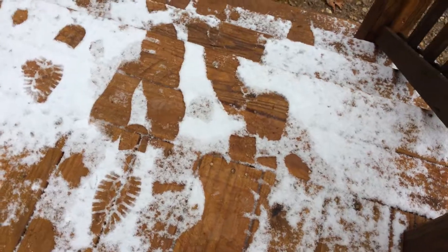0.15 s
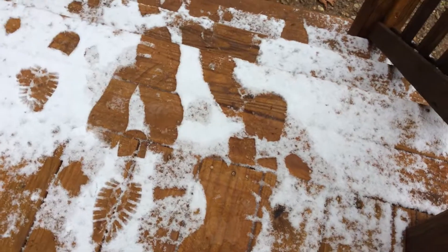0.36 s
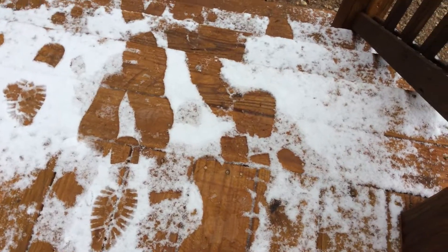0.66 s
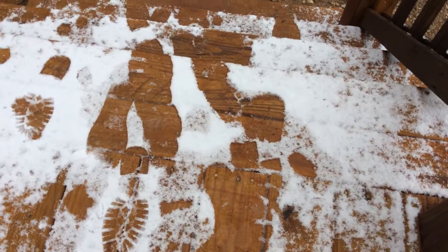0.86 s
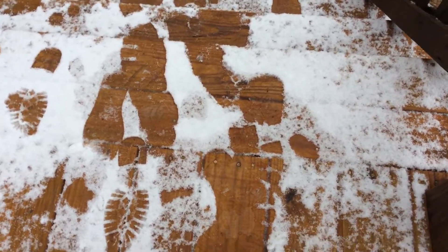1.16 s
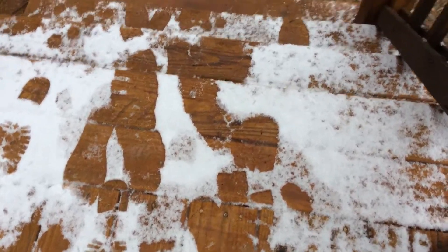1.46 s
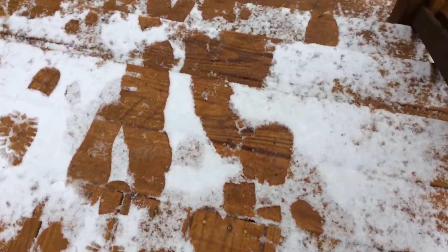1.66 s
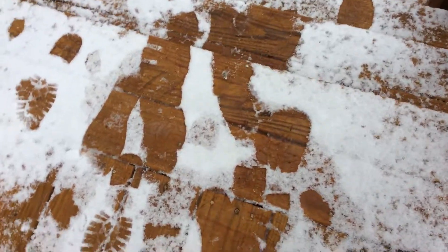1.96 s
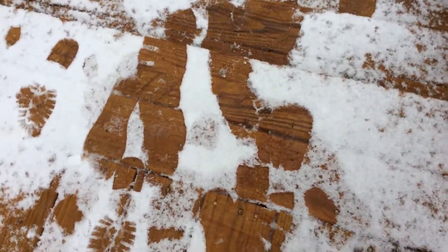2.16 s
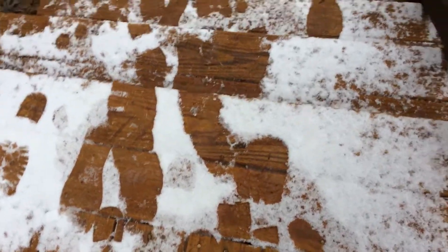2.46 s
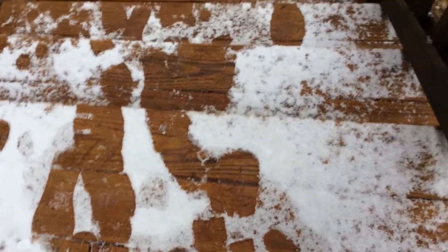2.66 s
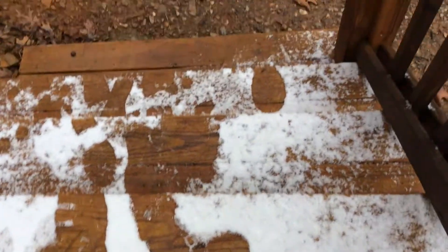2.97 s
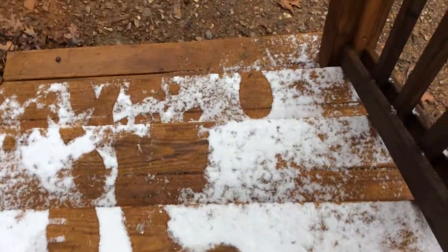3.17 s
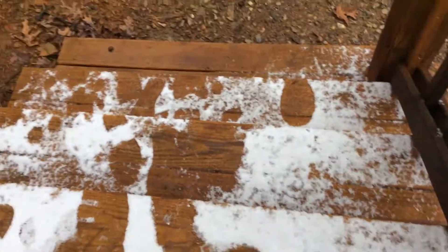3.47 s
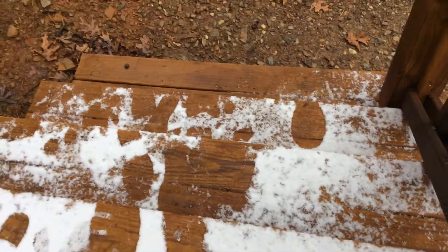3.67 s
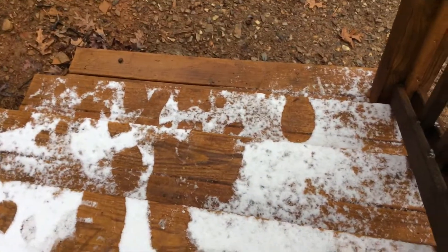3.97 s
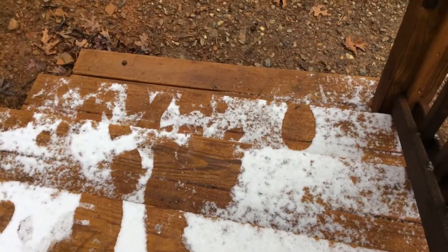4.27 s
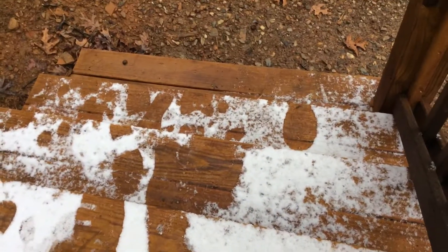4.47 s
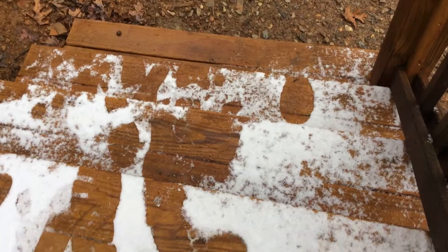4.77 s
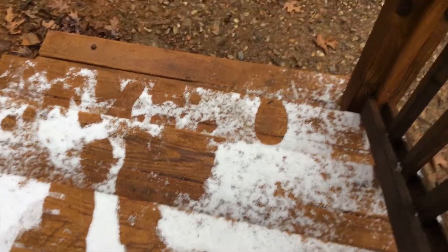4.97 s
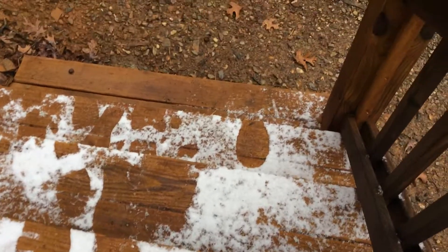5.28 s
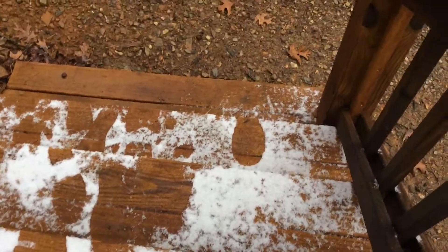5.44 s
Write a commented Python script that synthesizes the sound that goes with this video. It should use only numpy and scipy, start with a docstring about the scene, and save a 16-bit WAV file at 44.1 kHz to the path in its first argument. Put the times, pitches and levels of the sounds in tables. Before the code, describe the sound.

Slow, uneven footsteps crunch through a thin snow crust on wooden deck boards, with sharp crackles, dull knocks and a faint low hum beneath.

```python
"""Slow, uneven steps on a thin crust of snow over wooden deck boards, outdoors, close to the microphone.
Clothing swishes and light crackles come first; from 1.5 s heavier soles pack the snow in a fizz of tiny
fractures, with sharper cracks among them and the boards knocking below. A faint squeak falls in pitch at
2.2 s; uneven steps crowd together until 4.4 s, and a softer one lands near 5.2 s.
A low hum of steady sines and still outdoor air with far rumble, both shaped noise, lie under everything."""
import sys
import numpy as np
from scipy import signal
from scipy.fft import rfft, irfft
from scipy.io import wavfile

SR = 44100
rng = np.random.default_rng(int(sys.argv[2]) if len(sys.argv) > 2 else 0)


def put_to_file(sound):
    """Save the sound as 16-bit audio at rate SR, in the file named by the first command-line argument."""
    columns = np.atleast_2d(sound).T  # one column per channel
    safe = np.clip(columns, -1, 1)
    whole_steps = np.round(safe * 32767)
    wavfile.write(sys.argv[1], SR, whole_steps.astype(np.int16))


N = 247401

# Colour of breaking snow. Each row: frequency in Hz, relative level per Hz in dB.
SNOW_SPECTRUM = [(100, -36), (220, -14.5), (340, 0.5), (550, -5), (900, -10.5), (1300, -1.5), (1800, -1),
                 (2400, -7), (3200, -0.5), (4100, 1.5), (5500, -13.5), (7200, -17), (9000, -13),
                 (12000, -22), (16000, -28)]


def gain_of(db):
    """Decibels to amplitude."""
    return 10 ** (np.asarray(db) / 20)


def evened(x):
    """Scales to rms 1."""
    return x / np.sqrt(np.mean(x ** 2) + 1e-20)


def read(points, hz):
    """Reads a spectrum on a log-frequency axis."""
    f, value = np.transpose(points)
    return np.interp(np.log(hz + 1), np.log(f + 1), value)


def follow(rows, t):
    """Every column of a curve table at the times t."""
    s, *columns = np.transpose(rows)
    return [np.interp(t, s, c) for c in columns]


def add(mix, s, sound):
    """Mixes a sound in at s seconds."""
    part = mix[max(round(s * SR), 0):][:len(sound)]
    part += sound[:len(part)]


def coloured(x, points):
    """Gives x a spectrum, at rms 1."""
    gain = gain_of(read(points, np.fft.rfftfreq(N, 1 / SR)))
    return evened(irfft(rfft(x) * gain, N))


def drift(rate_hz):
    """Random wander of rms 1: noise under a Gaussian low-pass."""
    lowpass = np.exp(-(np.fft.rfftfreq(N, 1 / SR) / rate_hz) ** 2)
    return evened(irfft(rfft(rng.standard_normal(N)) * lowpass, N))


def grains(per_s, spread_db):
    """Random clicks of either sign: many small, a few large."""
    size = gain_of(spread_db * np.minimum(rng.exponential(1, N), 3.5))
    sign = rng.choice([-1., 1.], N)
    fires = rng.random(N) < per_s / SR
    return evened(size * sign * fires)


def causal(gain):
    """Minimum phase: the spectrum with this gain that starts at once and rings afterwards."""
    log_gain = np.log(np.maximum(np.r_[gain, gain[-2:0:-1]], 1e-5))
    return np.exp(np.conj(signal.hilbert(log_gain)))[:len(gain)]


def wavelet(t, hz, cycles, phase):
    """A fracture's ping: swells and dies within a few cycles; unit energy."""
    u = t * hz / cycles
    ping = u ** 2 * np.exp(-3 * u) * np.cos(2 * np.pi * (hz * t + phase))
    return ping / np.linalg.norm(ping)


def crunch(level_db=-2, clump_db=2.0, ring_db=5, octaves=0.35, fizz_db=0, boards_db=-1.0):
    """Thousands of tiny fractures, coming in clumps as the snow gives way under the weight."""
    clumps = gain_of(clump_db * drift(rate_hz=83))
    breaking = evened(fractures(per_s=330, spread_db=3.5, cycles=2.08, count=22) * clumps)
    # recolour frame by frame as the pressing sole changes
    hz, t, frames = signal.stft(breaking, SR, nperseg=256, noverlap=192)
    _, pitch_hz, treble_db, body_db = np.array(pressing(t))[:, :, None]
    colour = snow_colour(hz, t[:, None], pitch_hz, treble_db + fizz_db, body_db + boards_db,
                         ring_db, octaves)
    sound = signal.istft(frames * colour.T, SR, nperseg=256, noverlap=192)[1][:N]
    return sound * gain_of(level_db + pressing(np.arange(N) / SR)[0])


def fractures(per_s, spread_db, cycles, count):
    """Pings of many pitches, each pitch firing at its own random moments; roughly flat in spectrum."""
    t = np.arange(1024) / SR
    out = np.zeros(N)
    for hz in np.geomspace(260, 16000, count):
        # small, high crystals break more often
        moments = grains(per_s * np.sqrt(hz / 3000), spread_db)
        ping = wavelet(t, hz, cycles, rng.random())
        out += np.sqrt(hz) * signal.oaconvolve(moments, ping)[:N]
    return evened(out)


def pressing(t, attack_s=.008, attack_per_hold=.25, touch_db=-21, touch_s=.07):
    """Level, grain pitch, treble and body at times t: presses rise, hold and let go; their powers add, and each
    colour is a power-weighted mean over the presses."""
    # A heel or sole presses into the snow. Each row: start of full weight in seconds, hold in seconds,
    # release to fall 20 dB in seconds, level in dB before layer trims, pitch of the grains in Hz,
    # treble lift in dB and lift of the boards' low body in dB, both before layer trims.
    presses = [(0.03, .09, .1, -58, 2200, 7, 5), (0.205, .035, .06, -60, 3600, 5, 3),
               (0.372, .09, .2, -57.5, 3600, 9, 9), (1.479, .075, 0.09, -40.5, 3680, 11, 7),
               (1.566, 0.056, 0.05, -27, 3680, 5, -5.5), (1.655, .01, .05, -45, 3700, 7, 7),
               (1.681, 0.0074, 0.2037, -40.5, 3500, 7, 4), (1.835, .045, .07, -48.5, 3950, 10, 3),
               (2.59, .006, .06, -56, 3470, 8, 6), (2.747, .005, .018, -30, 3280, 2.5, 8),
               (2.77, .008, .05, -41, 3100, 3, 3), (2.803, .012, .06, -43.5, 3170, 7, 6),
               (2.898, .004, .02, -41, 3630, 4, 8), (2.968, 0.063, 0.08, -46.5, 2500, 8, 4),
               (3.403, .035, .07, -44.5, 1980, -2, 2), (3.694, .03, .08, -41.5, 2400, 6, 10),
               (3.76, .055, .018, -36.5, 2900, 5.5, 4), (3.903, .012, .03, -43.5, 2940, 3, 2),
               (3.98, .075, .05, -54, 3130, 6, 8.5), (4.237, .004, 0.0384, -33, 3070, 3, 7),
               (4.282, .028, .09, -45, 3040, 2, 5), (5.168, .006, .018, -42, 1800, 3, 7),
               (5.07, .012, .03, -57, 1900, -4, 0)]
    s, hold_s, release_s, db, *colours = np.transpose(presses)
    before = np.maximum(s - t[:, None], 0)
    after = np.maximum(t[:, None] - s - hold_s, 0)
    rise_s = attack_s + attack_per_hold * hold_s  # 20 dB of rise; a longer press comes on more slowly
    weight = gain_of(-20 * (before / rise_s + after / release_s))
    # light contact around each press fades 20 dB in touch_s
    touch = gain_of(touch_db - 20 * (before + after) / touch_s)
    power = (gain_of(db) * np.maximum(weight, touch)) ** 2 + 1e-14
    total = power.sum(1)
    return [10 * np.log10(total)] + [power @ colour / total for colour in colours]


def snow_colour(hz, s, pitch_hz, treble_db, body_db, ring_db, octaves, hollow_octaves=0.2):
    """Gain of breaking snow: two resonances, fizz on top, boards below; unit power in the crunch band."""
    # Each place the foot meets has its own colour. Each row: time in seconds, hollow resonance in Hz,
    # its lift in dB, lift of the sheen above about 12 kHz in dB.
    footing = [(.45, 1510, 8, 4), (1.49, 1750, -1, -6), (1.6, 1760, 9, -9.5), (1.9, 1700, -3.5, 0),
               (2.5, 2600, 2.5, 3), (2.8, 2020, 10, -8), (3.0, 2130, 4, -5), (3.42, 2023, 1, -2),
               (3.78, 2900, 11, -11), (4.0, 2870, 11, -17), (4.28, 3210, 1.5, -13), (5.17, 1478, 5, -3)]
    hollow_hz, hollow_db, sheen_db = follow(footing, s)
    hollow = hollow_db * np.exp(-(np.log2((hz + 1) / hollow_hz) / hollow_octaves) ** 2)
    ring = ring_db * np.exp(-(np.log2((hz + 1) / pitch_hz) / octaves) ** 2)
    treble = treble_db / (1 + (5900 / (hz + 1)) ** 10)
    sheen = sheen_db / (1 + (11800 / (hz + 1)) ** 20)
    body = body_db / (1 + (hz / 950) ** 6)
    gain = gain_of(read(SNOW_SPECTRUM, hz) + hollow + ring + treble + sheen + body)
    band = (hz > 1000) & (hz < 5000)
    return gain / np.sqrt(np.mean(gain ** 2 * band, axis=-1, keepdims=True))


def cracks(rows, level_db=-1, cycles=1.63, crumble=0.9, crumble_s=0.0015, rise_s=0.00038, echo_db=-11,
           echo_s=0.0041, ring_db=5, octaves=0.26, body_db=-3, fizz_db=1, weakest_db=-58):
    """Each crack is a short ping in a puff of crumbs; the boards scatter it back milliseconds later."""
    size = 2048
    out, t, hz = np.zeros(N), np.arange(size) / SR, np.fft.rfftfreq(size, 1 / SR)
    span = np.sqrt(.004 * SR)  # row levels refer to 4 ms
    band = (hz > 1000) & (hz < 5000)
    puff = np.exp(-t / crumble_s) * (1 - np.exp(-(t / rise_s) ** 2))
    noises = rng.standard_normal((len(rows), 2, size))
    for (s, db, pitch_hz, treble_db), (noise, scatter) in zip(rows, noises):
        if db < weakest_db:  # lighter contact does not break the crust
            continue
        colour = causal(snow_colour(hz, s, pitch_hz, treble_db + fizz_db, body_db, ring_db, octaves))
        crumbs = rfft(noise * puff) * colour / np.linalg.norm(noise * puff)
        ping = rfft(wavelet(t, pitch_hz, cycles, noise[0]))  # random phase
        crack = ping + crumble * crumbs
        crack = crack / np.sqrt(np.mean(abs(crack) ** 2 * band))
        echo = scatter * np.exp(-((t - echo_s) / 0.0039) ** 2)
        boards = 1 + gain_of(echo_db) * rfft(echo / np.linalg.norm(echo))
        add(out, s, gain_of(db + level_db) * span * irfft(crack * boards))
    return out


def small_cracks(per_s=90, over_db=-1.5, spread_db=2.2, scatter_octaves=.2, fizz_db=-1):
    """Rows of lesser cracks at jittered moments; they take the strength and colour of the pressing sole."""
    slots = np.arange(0, N / SR, 1 / per_s)
    late, size, tune = rng.standard_normal((len(slots), 3)).T
    s = np.clip(slots + .5 * late / per_s, 0, N / SR)
    db, pitch_hz, treble_db, _ = pressing(s)
    level_db = db + over_db + spread_db * np.minimum(size, 2)
    return np.c_[s, level_db, pitch_hz * 2 ** (scatter_octaves * tune), treble_db + fizz_db]


def knocks(level_db=-1, cycles=1.45, ring_db=-9, octaves=0.37):
    """A blunt push of a few cycles; the damped board modes near its pitch ring on briefly."""
    # A heel or sole meets the boards. Each row: start in seconds, level in dB before the layer trim,
    # pitch in Hz.
    board_hits = [(1.473, -36.5, 445.6), (2.4047, -27, 530), (2.409, -29.5, 570), (2.7442, -25, 368),
                  (2.747, -27.5, 690), (2.827, -31.5, 390), (2.971, -45.5, 350), (3.004, -41, 345),
                  (3.03, -41.5, 343), (3.416, -35.5, 352), (3.6923, -35.5, 400), (3.781, -43, 363.2),
                  (4.2343, -30, 521), (4.24, -31.5, 477), (5.171, -34.5, 377)]
    # Modes of a deck board. Each row: frequency in Hz, relative level in dB, 60 dB decay in seconds.
    board_modes = [(323, -8.5, 0.083), (383, -6.5, 0.034), (423, -15, 0.052), (490, 3, 0.06),
                   (530, -10, 0.038), (725, 17, 0.019), (1180, -8, .015)]
    out, t = np.zeros(N), np.arange(SR // 10) / SR
    for s, db, pitch_hz in board_hits:
        push = wavelet(t, pitch_hz, cycles, 0)
        modes = np.zeros(len(t))
        for hz, mode_db, t60 in board_modes:
            nearness = 1 / (1 + (np.log2(hz / pitch_hz) / octaves) ** 2)
            modes += gain_of(mode_db - 60 * t / t60) * np.sin(2 * np.pi * hz * t) * nearness
        ring = signal.fftconvolve(push, modes)[:len(t)]
        knock = push / abs(push).max() + gain_of(ring_db) * ring / abs(ring).max()
        add(out, s, gain_of(db + level_db) * knock)
    return out


def stray_ticks(level_db=-9, per_s=35):
    """Loose crystals snap now and then as the walker shifts weight."""
    return coloured(grains(per_s, spread_db=3.5), SNOW_SPECTRUM) * swishing() * gain_of(level_db)


def deck(x, tail_db=-19, tail_t60=0.21, delay_s=0.0041):
    """Railing and wall throw back a faint, short tail of decaying noise."""
    t = np.arange(SR // 3) / SR
    tail = rng.standard_normal(len(t)) * gain_of(-60 * t / tail_t60) * (t > delay_s)
    return x + gain_of(tail_db) * signal.fftconvolve(x, tail / np.linalg.norm(tail))[:N]


def clothing(level_db=-1, flutter_db=1.0):
    """Fabric sliding on fabric: a fine, dense hiss that follows the walker's movement."""
    # Colour of the fabric. Each row: frequency in Hz, relative level per Hz in dB.
    cloth_spectrum = [(800, -1.5), (1500, -17.5), (2200, -13.5), (3100, -7.5), (3950, 3.5), (5200, -6),
                      (7000, -9.5), (9000, -3.5), (11500, -10), (16000, -19.5)]
    hiss = coloured(grains(per_s=14000, spread_db=3.5), cloth_spectrum)
    return hiss * swishing() * gain_of(level_db + flutter_db * drift(rate_hz=120))


def swishing(base_db=-70.5):
    """Strength of the walker's movement: a smooth swell for each swing of a limb, never quite still."""
    # A sleeve or trouser leg swings past. Each row: middle in seconds, half length in seconds,
    # level in dB before layer trims.
    swings = [(0.024, 0.19, -62.5), (0.396, 0.084, -61), (.57, 0.11, -63.5), (0.794, 0.08, -68.5),
              (1.201, 0.12, -57.5), (1.41, 0.08, -58), (1.972, 0.14, -64), (2.347, 0.12, -58.5),
              (2.59, 0.14, -61.5), (3.14, 0.093, -61), (5.0, 0.16, -70), (5.25, .09, -65.5),
              (5.42, .14, -69)]
    t = np.arange(N) / SR
    power = sum((gain_of(db) * np.exp(-((t - s) / half_s) ** 2)) ** 2 for s, half_s, db in swings)
    return np.sqrt(power + gain_of(base_db) ** 2)


def squeak(start_s=2.215, length_s=.06, from_hz=1480, to_hz=1340, level_db=-66):
    """One faint squeak: a sine falling in pitch under a half-sine swell."""
    u = np.clip((np.arange(N) / SR - start_s) / length_s, 0, 1)
    turns = np.cumsum(from_hz + (to_hz - from_hz) * u) / SR
    return gain_of(level_db) * np.sin(np.pi * u) * np.sin(2 * np.pi * turns)


def hum(waver_db=0.5, wander=.08):
    """Steady low hum lines that waver slightly in phase (radians) and together in level."""
    # Lines of the hum. Each row: frequency in Hz, rms level in dB before the waver.
    hum_lines = [(120, -53), (144, -72), (180, -76), (240, -85.5)]
    t = np.arange(N) / SR
    lines = np.zeros(N)
    for hz, db in hum_lines:
        phase = 2 * np.pi * (hz * t + rng.random()) + wander * drift(rate_hz=3)
        lines += gain_of(db) * np.sin(phase)
    return np.sqrt(2) * lines * gain_of(waver_db * drift(rate_hz=3))


def outdoors(air_db=-62.5, rumble_db=-63):
    """Still air and a far, low rumble: two steady shaped noises."""
    # Colour of the still air. Each row: frequency in Hz, relative level per Hz in dB.
    air_spectrum = [(90, -36), (150, -4), (290, -9.5), (500, -15), (800, -20), (1100, -21.5), (1600, -29.5),
                    (2300, -31.5), (3400, -23), (5000, -46), (6900, -44), (9000, -41.5), (12900, -43),
                    (16000, -50)]
    # Colour of the far rumble. Each row: frequency in Hz, relative level per Hz in dB.
    rumble_spectrum = [(15, -17), (30, -18.5), (50, -2.5), (80, -2.5), (130, -2), (200, -12.5), (400, -42)]
    air, rumble = rng.standard_normal((2, N))
    return (gain_of(air_db) * coloured(air, air_spectrum)
            + gain_of(rumble_db) * coloured(rumble, rumble_spectrum))


def scene():
    """Steps on the deck over the quiet background."""
    # The loudest cracks of the crust. Each row: start in seconds, level over 4 ms in dB and
    # before the layer trim, pitch of the crack in Hz, treble lift in dB before the layer trim.
    loud_cracks = [(0.0247, -48.5, 1620, -2), (0.0847, -49, 1850, 10), (0.1232, -48, 1590, 9),
                   (0.1693, -55, 3510, 12.5), (0.3702, -46, 1590, 13), (0.4314, -48.5, 4000, 14),
                   (0.4632, -43.5, 1590, 7), (0.4693, -43, 1790, 23), (0.5544, -45.5, 3220, 6),
                   (1.4743, -39, 3560, 17), (1.478, -38, 3420, 19), (1.5066, -28, 3020, 12.5),
                   (1.5228, -37, 3820, 13), (1.5484, -33, 3330, 1), (1.5648, -22, 3650, -8),
                   (1.5848, -25, 2920, 9), (1.6041, -24.5, 1780, 8), (1.6334, -28.5, 3060, -11),
                   (1.7285, -29, 3900, 8.5), (1.752, -39, 3220, 1), (1.7975, -39.5, 3590, 4),
                   (1.833, -39.5, 3860, 5), (1.8632, -42, 4030, 17), (1.8792, -43.5, 4000, 26),
                   (1.9338, -42.5, 3650, 9), (2.4041, -43.5, 2230, -4), (2.4084, -44, 1580, -20),
                   (2.4527, -43.5, 2980, 5), (2.5029, -52, 3070, 1), (2.5686, -45, 1920, -9),
                   (2.5715, -41, 3220, 3), (2.5988, -34, 2840, 2), (2.7437, -30, 3360, 3),
                   (2.7463, -30, 2970, 4), (2.7492, -26, 2400, 6), (2.7515, -27, 3850, -5),
                   (2.7705, -32.5, 3240, -1), (2.7938, -29, 3500, 1), (2.8279, -20, 3430, -3),
                   (2.8337, -28, 3680, 2), (2.8545, -30, 2850, -2), (2.8928, -31, 3900, 2.5),
                   (3.1223, -50.5, 1720, 4.5), (3.346, -41.5, 1830, -7), (3.4078, -33, 2030, -2.5),
                   (3.4183, -26.5, 2890, -12), (3.4389, -34.5, 1750, -14), (3.4947, -47, 2840, 6),
                   (3.6839, -42.5, 3273, 14), (3.7152, -35.5, 2740, 10), (3.7379, -29.5, 3180, 6),
                   (3.7827, -25.5, 2770, 4), (3.8137, -32.5, 2780, 9), (3.8818, -38, 2880, 9.5),
                   (3.896, -32, 2880, 7), (3.911, -24, 2930, 2.5), (3.9235, -39, 3300, 11),
                   (3.945, -36, 2850, 6), (3.969, -31, 2025, 1), (3.982, -37, 3104, 8),
                   (4.0398, -33, 2760, 10.5), (4.072, -47.5, 2480, -1), (4.1023, -50, 1920, -2),
                   (4.2189, -37.5, 2690, 3), (4.2347, -29.5, 3160, 8.5), (4.2409, -32, 3100, -6),
                   (4.2966, -35, 3140, -2), (4.3045, -33, 3090, -5), (4.3507, -37.5, 3340, -3),
                   (4.4198, -50, 2470, -1), (4.7777, -57, 3470, 11), (5.035, -53, 3350, -4),
                   (5.0646, -44, 3600, -1.5), (5.1564, -33.5, 3540, -5), (5.1724, -35.5, 3300, 8),
                   (5.219, -44, 2400, 3), (5.2767, -51.5, 2170, -11)]
    steps = crunch() + cracks(loud_cracks) + cracks(small_cracks()) + knocks() + stray_ticks()
    background = clothing() + squeak() + hum() + outdoors()
    return (deck(steps) + background)[None]


def record(dry, edge_hz=16100):
    """Band limit: a steep linear-phase low-pass closes the top of the spectrum."""
    lowpass = signal.firwin(511, edge_hz, window=("kaiser", 9), fs=SR)
    return signal.oaconvolve(dry, lowpass[None], "same")


dry = scene()
out = record(dry)
put_to_file(out)
```